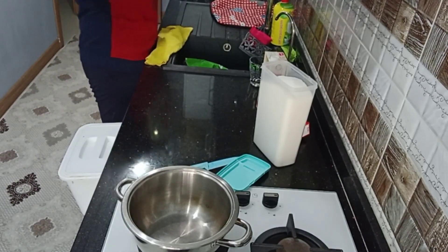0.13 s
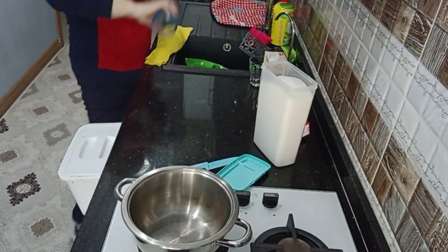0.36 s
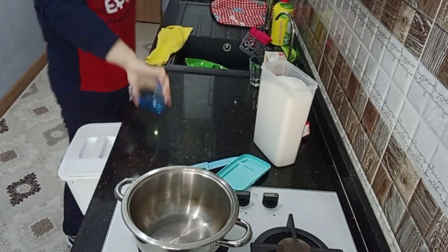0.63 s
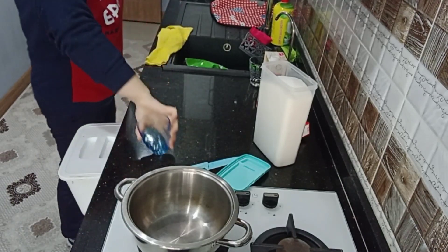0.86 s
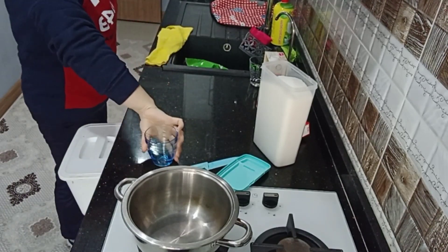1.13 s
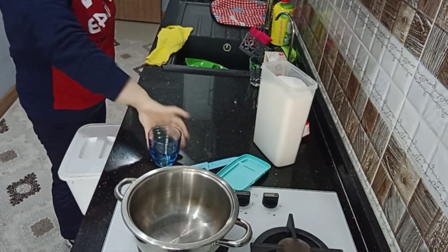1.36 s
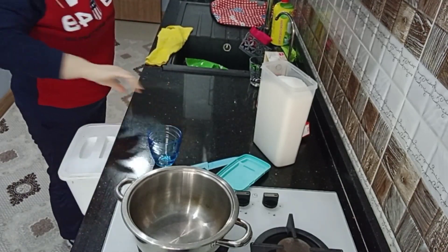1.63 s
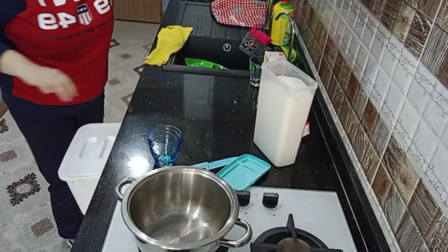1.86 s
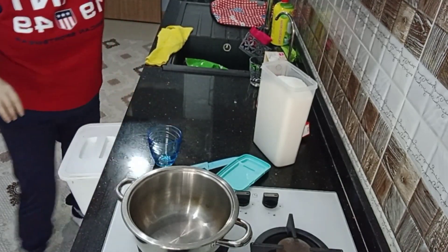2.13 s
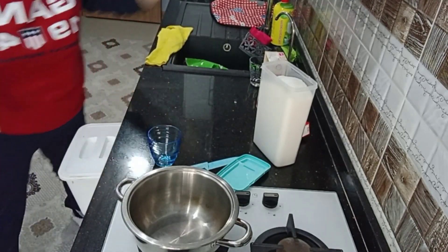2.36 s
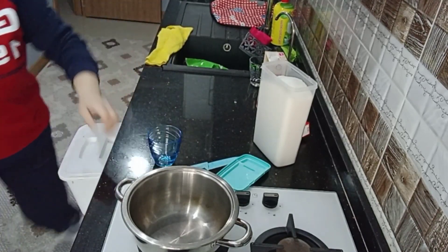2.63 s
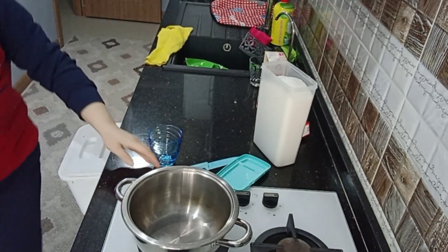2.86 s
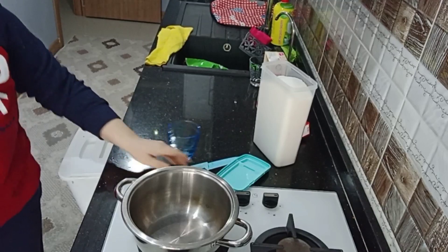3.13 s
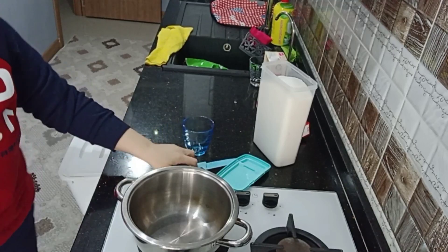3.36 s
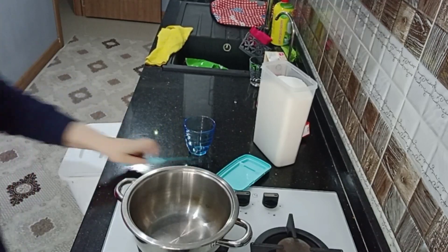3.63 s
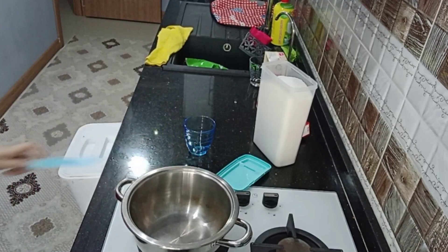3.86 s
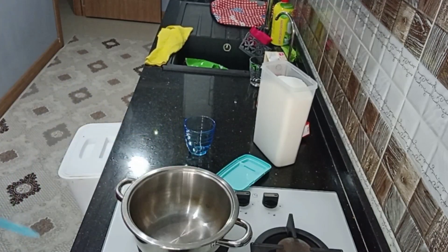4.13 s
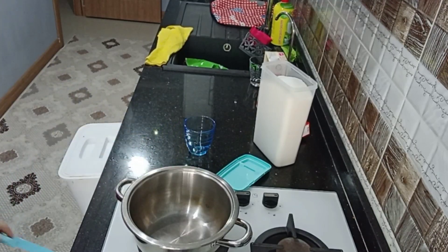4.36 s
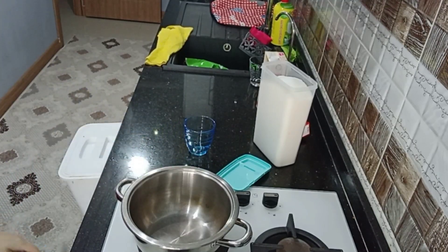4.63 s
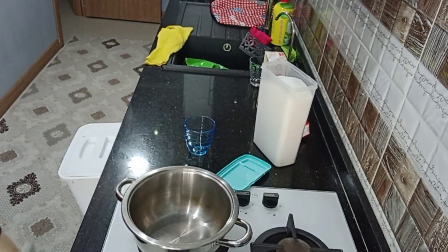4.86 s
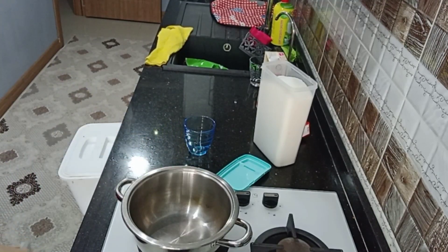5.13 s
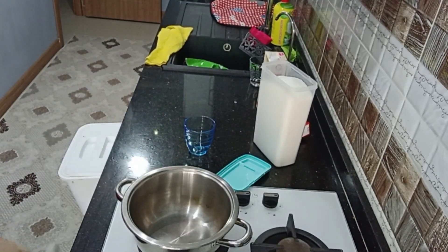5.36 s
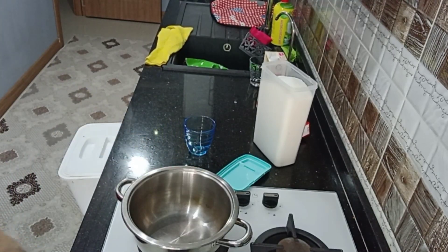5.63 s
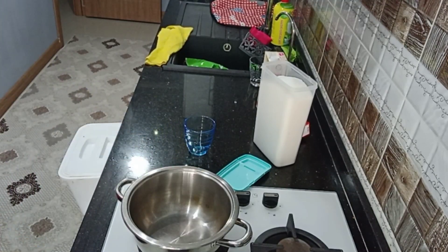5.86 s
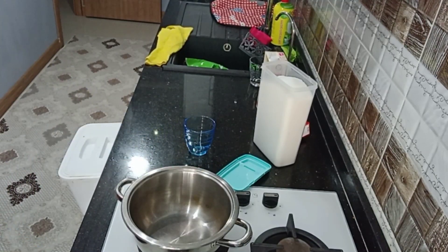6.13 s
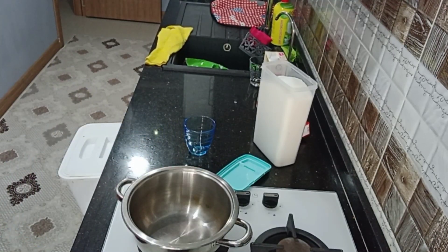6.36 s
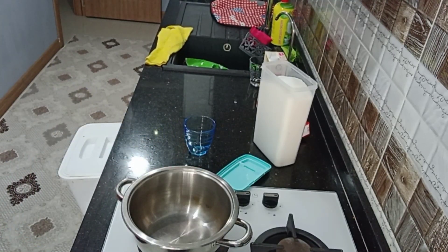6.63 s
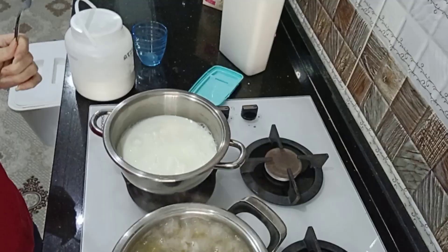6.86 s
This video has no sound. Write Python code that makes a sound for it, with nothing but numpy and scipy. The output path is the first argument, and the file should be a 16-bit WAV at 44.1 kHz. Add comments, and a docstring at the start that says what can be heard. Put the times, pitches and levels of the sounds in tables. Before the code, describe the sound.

Close kitchen handling: hard cup clunk, booming cupboard door, light plastic taps, rumbling drawer with a cutlery clatter, over a faint fridge hum.

```python
"""A tiled kitchen, small stereo microphone close by: shaped noise is the air, a wavering sine the fridge hum.
A cup is set on a stone counter (ringing modes and a coloured rattle); a cupboard door swings shut (bumps
through cabinet resonances, a knock, low booms); a plastic knife is picked up with knocks and finger rubbing.
A drawer rolls out (bumps through box resonances, thumps), the knife drops into the tray, the drawer rolls shut.
The hard room adds a short noise tail to knocks, thumps and rubbing; faint tones and small ticks come between."""
import sys
import numpy as np
from scipy import signal
from scipy.fft import rfft, irfft
from scipy.io import wavfile
from scipy.ndimage import uniform_filter1d

SR = 44100
rng = np.random.default_rng(int(sys.argv[2]) if len(sys.argv) > 2 else 0)


def magnitude_from_level(level_db):
    """Linear magnitude for a level in decibels (20 dB per decade)."""
    exponent = np.asarray(level_db, float) / 20
    return 10 ** exponent


def put_to_file(sound):
    """Save the sound as 16-bit audio at rate SR, in the file named by the first command-line argument."""
    columns = np.atleast_2d(sound).T  # one column per channel
    safe = np.clip(columns, -1, 1)
    whole_steps = np.round(safe * 32767)
    wavfile.write(sys.argv[1], SR, whole_steps.astype(np.int16))


N = 308347  # length of the scene [samples]

# colour of hard things struck, knife and ticks: (frequency [Hz], level [dB])
KNIFE_COLOUR = [(180, -22.5), (300, -1), (870, -4), (1100, -4.5), (1640, -3.5), (2070, 0.5), (2320, -5.5),
                (2520, -4.5), (3700, -5.5), (5700, -2.5), (8940, -7.5), (12100, -10), (16000, -21)]
# ringing modes of knife, tray and ticks: (frequency [Hz], level [dB], time to fall 60 dB [s])
KNIFE_MODES = [(410, -8, .06), (2050, -3, .05), (2650, -2, .05), (3200, -5, .04), (3480, 0, .08),
               (4700, -4, .06), (5900, -1, .05)]


def evened(x):
    """Scales to rms 1."""
    return x / np.sqrt(np.mean(x ** 2) + 1e-20)


def read(points, hz):
    """Reads a spectrum table on a log-frequency axis."""
    f, value = np.transpose(points)
    return np.interp(np.log(hz + 1), np.log(f + 1), value)


def add(mix, s, sound):
    """Mixes a sound in from time s."""
    part = mix[:, round(s * SR):][:, :sound.shape[1]]
    part += sound[:, :part.shape[1]]


def resonate(x, hz, width):
    """A resonance of gain 1 at hz: shifted down to 0 Hz, smoothed, shifted back."""
    turn = np.exp(2j * np.pi * hz * np.arange(len(x)) / SR)
    r = np.exp(-np.pi * width / SR)
    return 2 * (turn * signal.lfilter([1 - r], [1, -r], x / turn)).real


def causal(db_at, size=2048):
    """Minimum-phase impulse response of a dB curve over Hz."""
    hz = abs(np.fft.fftfreq(2 * size, 1 / SR))
    log_gain = np.log(magnitude_from_level(np.maximum(db_at(hz), -100)))
    return np.fft.ifft(np.exp(np.conj(signal.hilbert(log_gain)))).real[:size]


def diffuse(length, magnitude, size=512):
    """Noise at both microphone ports, most alike in the bass, shaped by magnitude(Hz, s)."""
    # (frequency [Hz], left-right likeness [0 to 1])
    likeness = [(60, 1), (130, 0.83), (250, 0.83), (400, 0.7), (640, 0.18), (1400, 0.088), (4000, 0.04)]
    hop = size // 4
    frames = length // hop + 5
    hz = np.fft.rfftfreq(size, 1 / SR)[:, None]
    a, b, c, d = rng.standard_normal((frames, len(hz), 4)).T
    same = np.clip(read(likeness, hz), -1, 1)
    left = a + 1j * b
    right = same * left + np.sqrt(1 - same ** 2) * (c + 1j * d)
    z = np.array([left, right]) * magnitude(hz, np.arange(frames) * hop / SR)
    return signal.istft(z, nperseg=size, noverlap=size - hop)[1][:, :length]


def in_room(x, wet_db):
    """Direct sound, a little late at the left port, plus a tail that swells over the first reflections."""
    # decay of the tiled room: (frequency [Hz], time to fall 60 dB [s])
    decay = [(60, 0.4), (260, 0.42), (700, 0.4), (1840, 0.36), (4850, 0.25), (12800, 0.24)]
    tail = diffuse(SR // 2 + SR // 4, lambda hz, s: magnitude_from_level(-60 * s / read(decay, hz)))
    t = np.arange(tail.shape[1]) / SR
    tail = tail * (1 - np.exp(-np.maximum(t - .002, 0) / 0.00043))
    tail = magnitude_from_level(wet_db) * tail / np.linalg.norm(tail[0])
    tail[[0, 1], [3, 0]] += 1  # direct sound: left 3 samples after right
    return signal.fftconvolve(x[None], tail, axes=1)


def knocks(rows, colour, modes, lift_db, ring_db, wet_db):
    """Each knock rings the modes while a short rattle of contact takes the body's colour; then the room."""
    out = np.zeros((2, N))
    t = np.arange(SR // 2) / SR
    for s, db, tilt, contact, spot_hz in rows:
        def blow_db(hz):
            """The blow's spectrum: a tilt, and a lift around the struck spot's pitch."""
            spot = np.exp(-(np.log2((hz + 30) / spot_hz) / 0.33) ** 2)
            return tilt * np.log2((hz + 30) / 2000) + lift_db * spot
        fall = (t[:4096] + 0.00036) ** 0.15 * np.exp(-t[:4096] / max(contact, 1e-4))
        rattle = rfft(rng.standard_normal(4096) * fall)
        # flatten the spectrum so the rattle has no colour of its own
        rattle = irfft(rattle / np.sqrt(uniform_filter1d(abs(rattle) ** 2, size=40)))[:3000]
        body = signal.fftconvolve(rattle, causal(lambda hz: read(colour, hz) + blow_db(hz)))
        ring = sum(magnitude_from_level(g + blow_db(f) - 60 * t / t60) * np.sin(2 * np.pi * f * t) for f, g, t60 in modes)
        ring = ring * (1 - np.exp(-t / max(contact / 2, 1e-4)))
        sound = magnitude_from_level(ring_db) * ring / np.linalg.norm(ring)
        sound[:len(body)] += body / np.linalg.norm(body)
        heard = in_room(sound, wet_db)
        # level follows the rms of the first 1300 samples
        add(out, s, magnitude_from_level(db) * heard / (2.15 * np.sqrt(np.mean(heard[:, :1300] ** 2))))
    return out


def stroke(t, start, rise, hold, db, fade):
    """Level of one stroke: climbs 13.5 dB during its rise, holds, then fades at a steady dB rate."""
    climb_db = 13.5 * np.minimum((t - start) / max(rise, 1e-3) - 1, 0)
    return magnitude_from_level(db + climb_db - fade * np.maximum(t - start - rise - hold, 0))


def rubbing(rows, peaks, bumps_per_s, spread_db, hiss_db, wet_db):
    """Uneven bumps shake a resonant body; some raw grit passes over its resonances."""
    t = np.arange(N) / SR
    hit, sign, size = rng.random((N, 3)).T
    bumps = (hit < bumps_per_s / SR) * np.sign(sign - .5) * magnitude_from_level(-spread_db * np.log(size + 0.01))
    body = sum(magnitude_from_level(g) / np.sqrt(w) * resonate(resonate(bumps, f, w), f, 2 * w) for f, w, g in peaks)
    grit = signal.fftconvolve(bumps, causal(lambda hz: -7. * abs(np.log2((hz + 5) / 500))))[:N]
    level = sum(stroke(t, *row) for row in rows)
    sound = (evened(body) + magnitude_from_level(hiss_db) * evened(grit)) * level
    return in_room(sound, wet_db)[:, :N] / np.sqrt(1 + magnitude_from_level(2 * wet_db))


def thumps(rows):
    """Soft low blows: a hollow box swells for a few cycles and dies, its second mode faster."""
    out = np.zeros((2, N))
    t = np.arange(SR // 4) / SR
    u = t / .01  # time in units of the 10 ms swell
    for s, db, hz in rows:
        first = u * np.exp(1 - u) * np.sin(2 * np.pi * hz * t)
        second = 0.34 * u * np.exp(1 - 3.0 * u) * np.sin(2 * np.pi * 2.18 * hz * t)
        add(out, s, magnitude_from_level(db) * in_room(first + second, -3.0))
    return out


def tone(hz, level, waver):
    """A sine, the same at both ports, under a level envelope that wavers a little."""
    drift = uniform_filter1d(uniform_filter1d(rng.standard_normal(len(level)), size=900), size=900)
    wave = np.sin(2 * np.pi * hz * np.arange(len(level)) / SR)
    return np.sqrt(2) * level * (1 + waver * evened(drift)) * wave * np.ones((2, 1))


def air():
    """Steady appliance and microphone noise with a few spectral humps, slightly patchy."""
    # background slope: (frequency [Hz], level [dB])
    slope = [(30, -60), (60, -38), (83, -11), (102, -6.5), (124, -6.5), (230, -14.5), (400, -15),
             (543, -18.5), (1490, -22), (1760, -22.5), (4000, -31), (8600, -36), (11300, -41.5),
             (11800, -33), (13500, -35.5), (14200, -36), (16000, -38)]
    # humps on it: (frequency [Hz], width [Hz], height above the slope [dB])
    bands = [(400, 19, 18.5), (1109, 50, 7.5), (1468, 285, 9), (2015, 105, 7.5), (4490, 125, 7),
             (5650, 730, 9), (12040, 300, 9.5), (13010, 920, 18.5)]

    def magnitude(hz, s):
        humps = sum(db / (1 + (2 * (hz - f) / w) ** 2) for f, w, db in bands)
        patches = rng.standard_normal((len(s), len(hz))).T
        patches = evened(uniform_filter1d(uniform_filter1d(patches, size=4, axis=0), size=8, axis=1))
        return magnitude_from_level(read(slope, hz) + humps + 3.2 * patches)
    return magnitude_from_level(-54.5) * evened(diffuse(N, magnitude, size=2048))


def fridge_hum():
    """The fridge motor hums as one 100 Hz sine whose level drifts."""
    # (time [s], level [dB])
    levels = [(0, -60.5), (.5, -54.5), (1, -60.5), (3.5, -57.5), (6.99, -59.5)]
    level_db = np.interp(np.arange(N) / SR, *np.transpose(levels))
    return tone(100, magnitude_from_level(level_db), waver=0.048)


def faint_tones():
    """Faint brief wavering sines with soft ends."""
    # (start [s], length [s], frequency [Hz], level [dB])
    rows = [(.07, 0.187, 519, -65.5), (3.046, 0.1, 1033, -58.5), (3.45, 0.025, 1290, -55),
            (6.04, 0.154, 440, -60.5)]
    out = np.zeros((2, N))
    for s, length, hz, db in rows:
        envelope = magnitude_from_level(db) * signal.windows.tukey(round(length * SR), .4)
        add(out, s, tone(hz, envelope, waver=0.18))
    return out


def ticks():
    """Small thin ticks of something hard nearby."""
    # (time [s], level [dB], tilt [dB per octave], contact time [s], pitch of the struck spot [Hz])
    hits = [(1.732, -41, -0.57, 0.00088, 3400), (6.9087, -45.5, -1.5, 0.0018, 2520)]
    return knocks(hits, KNIFE_COLOUR, KNIFE_MODES, lift_db=6.5, ring_db=-8, wet_db=-4)


def fingers_on_counter():
    """Fingers rub the counter: dense bumps with much grit over its resonances."""
    # (start [s], rise [s], hold [s], level [dB], fade [dB per s])
    strokes = [(2.99, 0.021, 0.059, -58.5, 24.8), (3.362, 0.015, 0.013, -56.5, 100),
               (3.48, 0.004, 0.0035, -49, 303), (3.55, 0.0098, 0.022, -54.5, 90)]
    # counter resonances: (frequency [Hz], width [Hz], level [dB])
    counter = [(440, 43, -2.5), (734, 360, 9), (970, 55, 1), (1380, 52, 1), (2000, 330, -13)]
    return rubbing(strokes, counter, bumps_per_s=2500, spread_db=3.0, hiss_db=-4.3, wet_db=-0.5)


def drawer_box():
    """Bumps shake the hollow drawer box as it rolls and as the knife lands in it."""
    # (start [s], rise [s], hold [s], level [dB], fade [dB per s])
    strokes = [(4.31, 0.15, 0.44, -40, 200), (5.015, 0.0068, 0.0092, -41, 69),
               (5.26, 0.1, 0.53, -42.5, 104), (6.03, 0.079, 0.056, -54.5, 40)]
    # box resonances: (frequency [Hz], width [Hz], level [dB])
    box = [(80.4, 10, -6), (108.2, 21, 1), (158, 31, -0.5), (187, 43, -3.5), (255, 20.4, -5.5),
           (340.4, 38.5, -9.5), (381.5, 136, -9.5), (505, 470, -23)]
    return rubbing(strokes, box, bumps_per_s=400, spread_db=2.0, hiss_db=-13.5, wet_db=-0.3)


def drawer_thumps():
    """Rollers drop over joints in the runner and the box booms."""
    # (time [s], level [dB], pitch of the box [Hz])
    drops = [(4.364, -39, 172), (4.496, -30, 143), (4.621, -38, 150), (4.79, -31.5, 171),
             (4.856, -29.5, 156.4), (4.931, -42, 104), (5.309, -40, 142), (5.372, -28, 156),
             (5.445, -28, 152.3), (5.553, -39.5, 163), (5.67, -32, 156.4), (5.75, -35.5, 99)]
    return thumps(drops)


def drawer_knocks():
    """The drawer jolts, its contents rattle, and it meets its stop."""
    # (time [s], level [dB], tilt [dB per octave], contact time [s], pitch of the struck spot [Hz])
    hits = [(4.47, -47.5, 2.7, 0.036, 1520), (4.508, -41.5, 1.2, 0.019, 2830),
            (4.765, -34.5, 0.84, 0.0061, 550), (5.205, -40.5, 1.6, 0.0023, 440),
            (5.826, -31, 1, 0.0025, 860), (5.843, -34.5, 3.1, 0.00087, 930),
            (6.169, -53.5, 1.2, 0.0056, 2330)]
    # (frequency [Hz], level [dB])
    colour = [(180, 0), (300, 8.5), (649, 3), (734, -4), (911, -5), (1220, -2.5), (2070, -4), (4980, -26),
              (6180, -20.5), (12000, -46), (15600, -94), (22000, -120)]
    # (frequency [Hz], level [dB], time to fall 60 dB [s])
    modes = [(430, -4, .06), (760, -4, .05), (840, 0, .06), (930, -1, .05), (1050, -3, .05),
             (2400, -8, .03), (2900, -6, .03)]
    return knocks(hits, colour, modes, lift_db=15, ring_db=-1.5, wet_db=2.5)


def cutlery_tray():
    """Loose cutlery rattles as the knife lands, so damped that it barely rings."""
    # (time [s], level [dB], tilt [dB per octave], contact time [s], pitch of the struck spot [Hz])
    hits = [(5.0105, -23.5, 0.1, 0.006, 5500), (5.037, -22, 1, 0.0025, 6100),
            (5.06, -31.5, -0.58, 0.0079, 2300), (5.09, -32.5, -2.1, 0.011, 3120)]
    # (frequency [Hz], level [dB])
    colour = [(180, -31), (300, -2), (1040, -13), (1580, -9.5), (2070, -2.5), (3700, -7.5), (5700, -6),
              (8940, -13), (12100, -5), (16000, -12.5)]
    return knocks(hits, colour, KNIFE_MODES, lift_db=3, ring_db=-18, wet_db=4.5)


def knife_on_stone():
    """The plastic knife knocks on stone: light blows and short ringing."""
    # (time [s], level [dB], tilt [dB per octave], contact time [s], pitch of the struck spot [Hz])
    hits = [(2.993, -49.5, 5, 0.019, 12000), (3.367, -38, -9, 0.002, 400), (3.392, -44, 2.5, 0.0051, 2700),
            (3.482, -34.5, 3, 0.0024, 2200), (3.5507, -31, -0.6, 0.0016, 2700),
            (3.634, -28.5, 10, 0.0026, 3500)]
    return knocks(hits, KNIFE_COLOUR, KNIFE_MODES, lift_db=7, ring_db=-5, wet_db=1.5)


def cabinet_shaking():
    """The door's swing, then its slam, shakes the cabinet with sparse bumps."""
    # (start [s], rise [s], hold [s], level [dB], fade [dB per s])
    strokes = [(1.54, 0.15, 0.13, -47, 200), (1.882, .012, 0.048, -33, 129)]
    # cabinet resonances: (frequency [Hz], width [Hz], level [dB])
    cabinet = [(73.6, 19, -16), (100, 19, 2.5), (152.8, 7.8, 3), (313, 32, -2), (440, 220, -5)]
    return rubbing(strokes, cabinet, bumps_per_s=250, spread_db=2, hiss_db=-18.5, wet_db=-8.5)


def cabinet_booms():
    """The cabinet booms as the door nears and meets its frame."""
    # (time [s], level [dB], pitch [Hz])
    booms = [(1.825, -35, 105), (1.894, -31, 124), (1.925, -25.5, 113), (1.992, -30, 100)]
    return thumps(booms)


def door_knocks():
    """Door, catch and frame knock together over long low modes and short high ones."""
    # (time [s], level [dB], tilt [dB per octave], contact time [s], pitch of the struck spot [Hz])
    hits = [(1.697, -49.5, 3, 0.01, 2000), (1.738, -31, -2.5, 0.012, 426), (1.886, -22, 1.5, 0.016, 300),
            (1.894, -11.5, 0.9, 0.0032, 2590), (1.989, -35, -5, 0.015, 200)]
    # (frequency [Hz], level [dB])
    colour = [(24, -32), (40, -8), (256, -2.5), (600, -6), (680, -5.5), (852, -5.5), (1180, -8.5),
              (1270, -5.5), (3380, -9), (3830, -12.5), (9940, -31), (12100, -27.5), (16000, -40)]
    # (frequency [Hz], level [dB], time to fall 60 dB [s])
    modes = [(98.6, 3, 0.47), (151.5, -5.5, 0.21), (256, -14, 0.19), (400, 8.5, 0.037), (712, 3, 0.078),
             (3400, 19, 0.014)]
    return knocks(hits, colour, modes, lift_db=3.0, ring_db=-9.5, wet_db=2.5)


def cup_on_counter():
    """The cup knocks on the stone counter and its many close modes ring briefly."""
    # (time [s], level [dB], tilt [dB per octave], contact time [s], pitch of the struck spot [Hz])
    hits = [(1.038, -9.5, 1.5, 0.0023, 950), (1.048, -15.5, -1.7, 0.0059, 540),
            (1.059, -12.5, 1.1, 0.0064, 1810), (1.079, -51, -0.33, 0.0018, 1030),
            (1.302, -27, -1.5, 0.015, 1860), (1.323, -26.5, -0.4, 0.0012, 890),
            (1.337, -28.5, 0, 0.003, 1900), (3.045, -46, -1.5, 0.0056, 1030)]
    # (frequency [Hz], level [dB])
    colour = [(35, -35), (60, -23.5), (301, -10), (503, -5.5), (682, -2), (991, -3), (1660, -7.5),
              (1910, -5), (3340, -9.5), (8320, -41), (10800, -63), (11800, -28), (16000, -87)]
    # (frequency [Hz], level [dB], time to fall 60 dB [s])
    modes = [(404, -12, .09), (512, -3, .11), (916, -5, .06), (970, -4, .07), (1017, -1, .09),
             (1170, -6, .08), (1432, -5, .07), (1890, -4, .07), (1954, -6, .07), (2401, -9, .06),
             (2627, -8, .06), (2982, -8, .05), (3640, -15, .05), (3951, -16, .05)]
    return knocks(hits, colour, modes, lift_db=4.5, ring_db=-1.5, wet_db=4)


def scene():
    """All sources together: background first, then the handled objects."""
    mix = air() + fridge_hum() + faint_tones() + ticks()
    mix += fingers_on_counter() + knife_on_stone()
    mix += drawer_box() + drawer_thumps() + drawer_knocks() + cutlery_tray()
    mix += cabinet_shaking() + cabinet_booms() + door_knocks()
    mix += cup_on_counter()
    return mix


def low_pass(x):
    """Removes everything above the highest recorded frequency."""
    return signal.sosfilt(signal.butter(12, 16650, fs=SR, output="sos"), x)


def record(dry):
    """The microphone's two ports differ in colour; bass below 62 Hz and all from 16050 Hz up are cut."""
    # (frequency [Hz], left over right [dB])
    balance = [(40, -8.5), (110, 1), (200, -2.5), (380, 1.5), (1290, 0.7), (2380, 1.5), (4400, 2),
               (8100, 9), (10000, -4), (12000, -17.5), (15000, -9.5)]
    hz = np.fft.rfftfreq(N, 1 / SR)
    lean = read(balance, hz) / 2
    both = np.sqrt((magnitude_from_level(2 * lean) + magnitude_from_level(-2 * lean)) / 2)  # keeps the summed power of the ports
    bass_cut = 1 / np.sqrt(1 + (62 / (hz + 1)) ** 12)
    ports = magnitude_from_level(np.array([lean, -lean])) / both * bass_cut * (hz < 16050)
    mix = irfft(rfft(dry) * ports, N)
    return low_pass(mix)


dry = scene()
out = record(dry)
put_to_file(out)
```